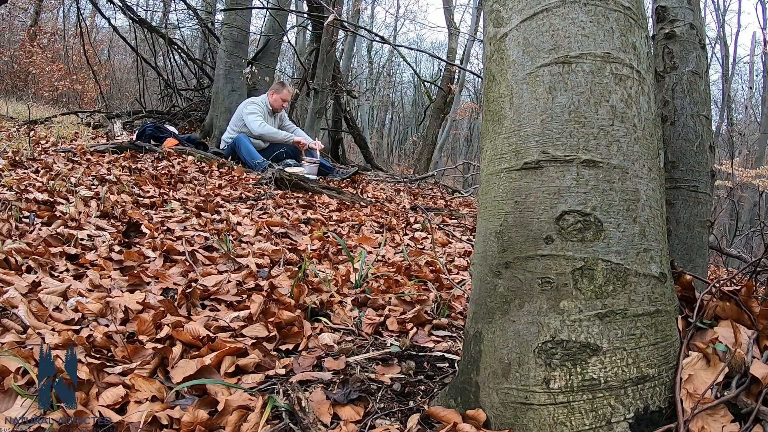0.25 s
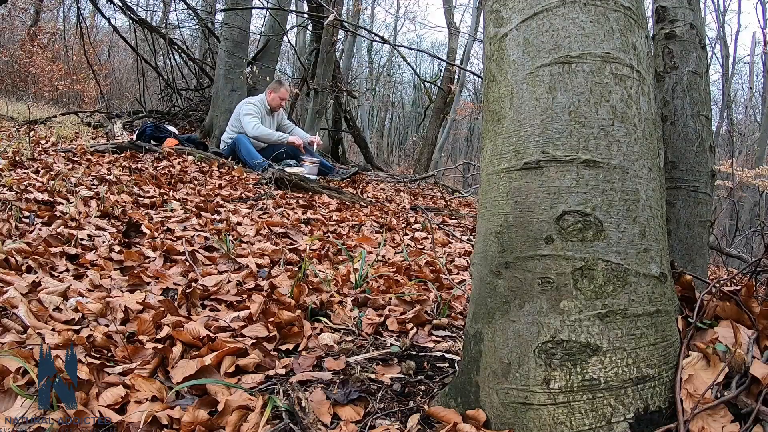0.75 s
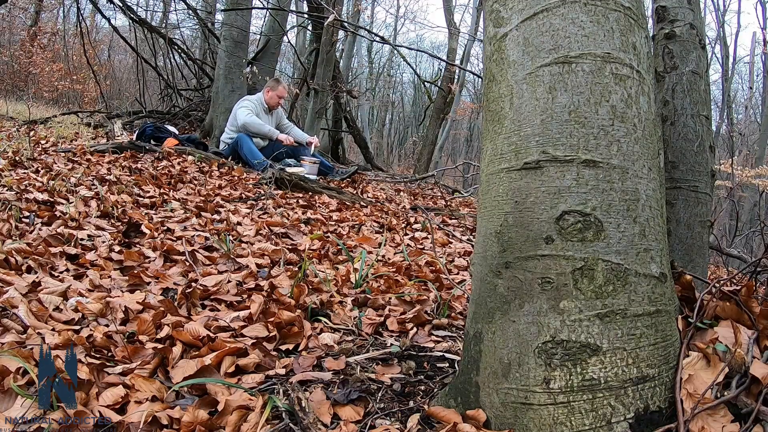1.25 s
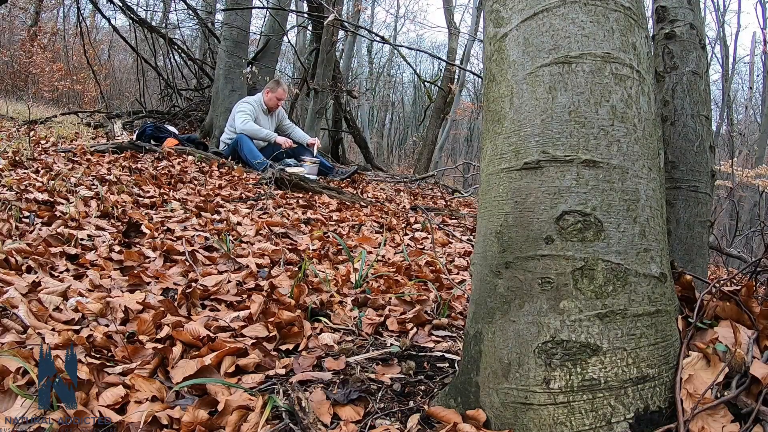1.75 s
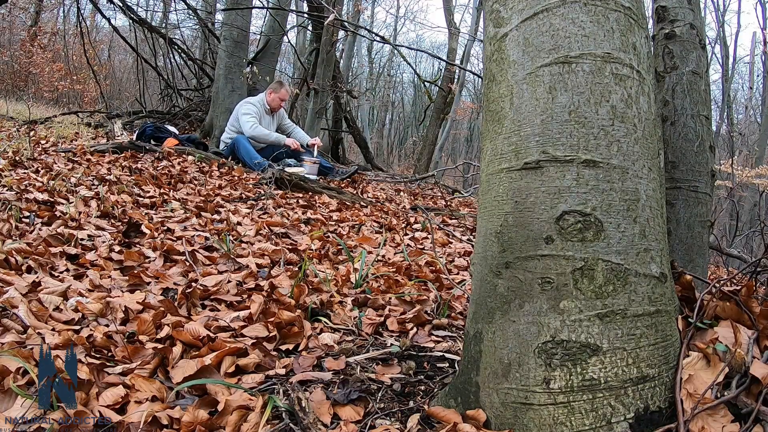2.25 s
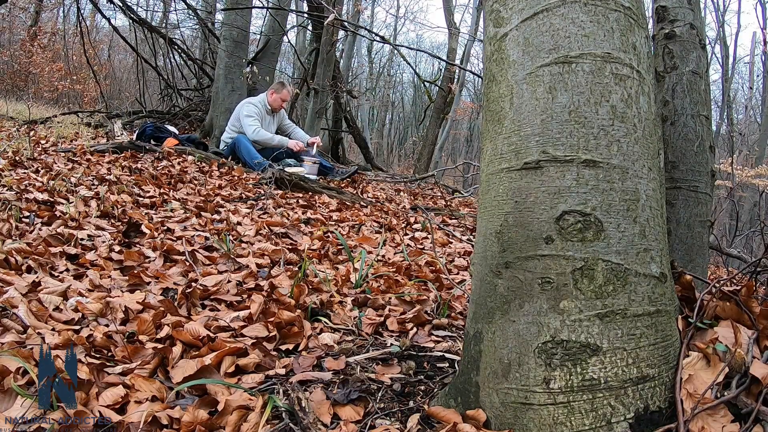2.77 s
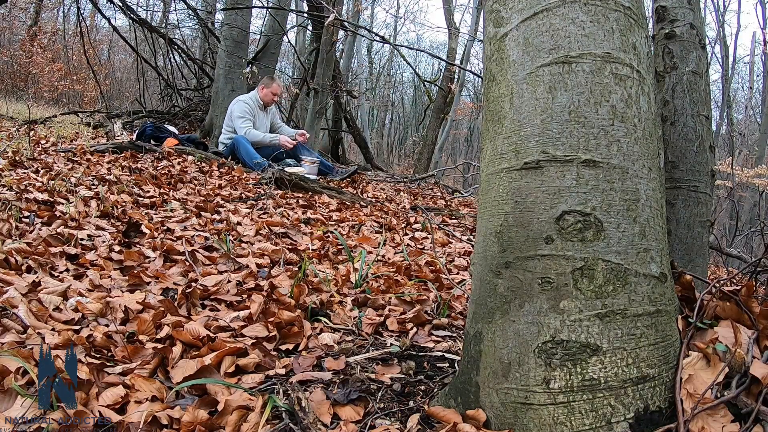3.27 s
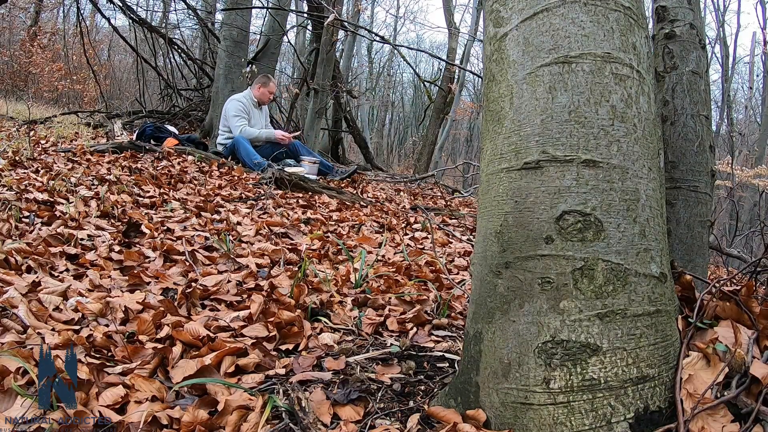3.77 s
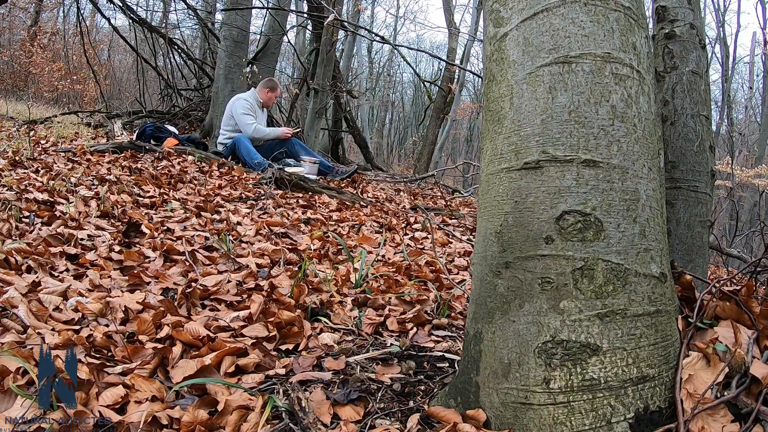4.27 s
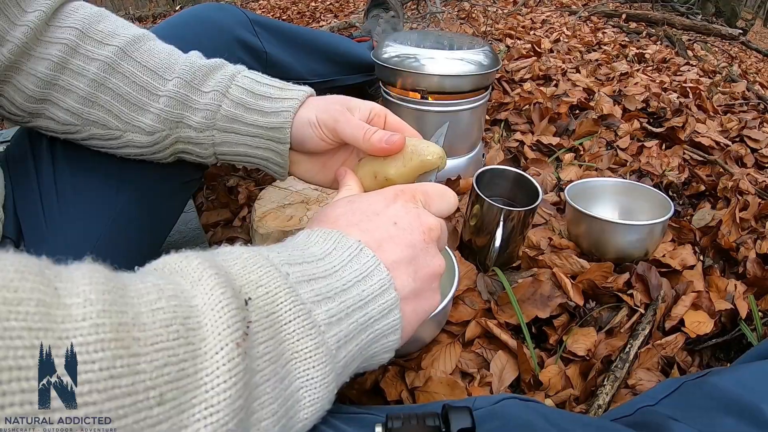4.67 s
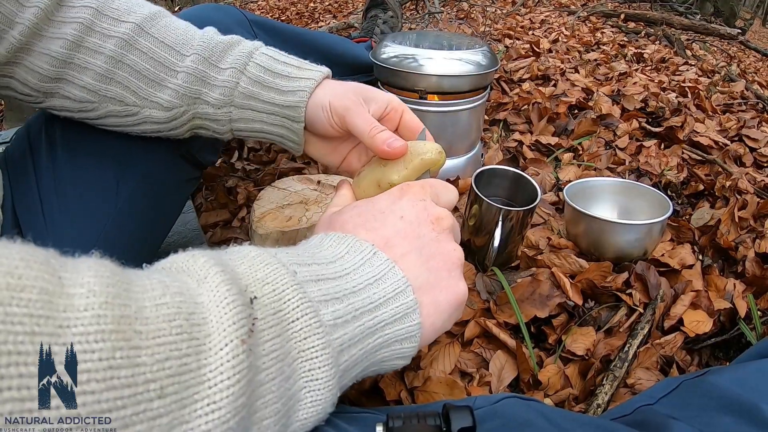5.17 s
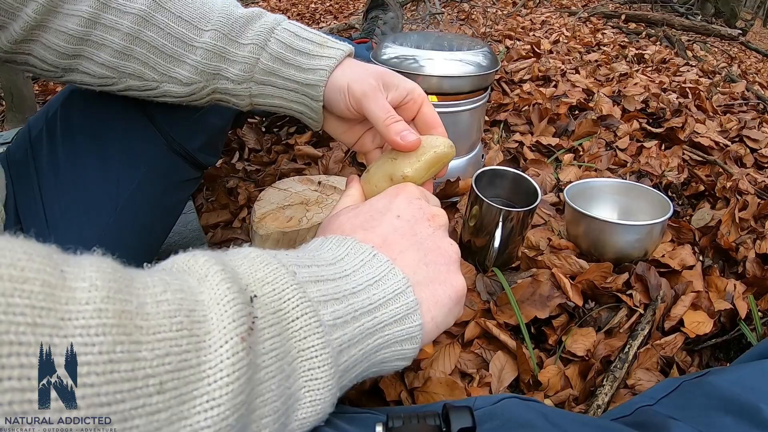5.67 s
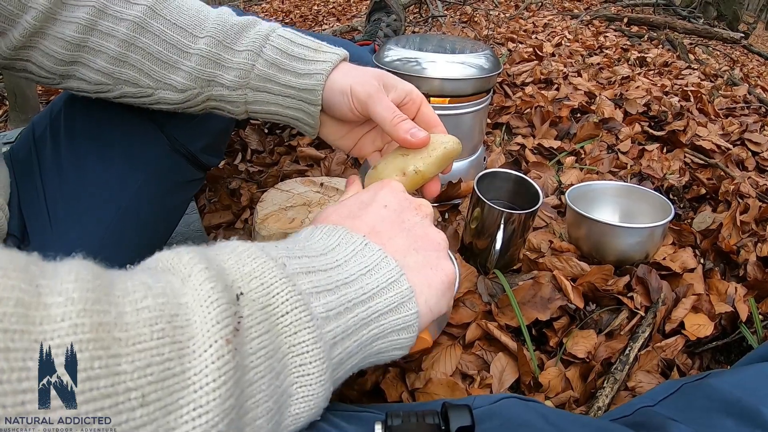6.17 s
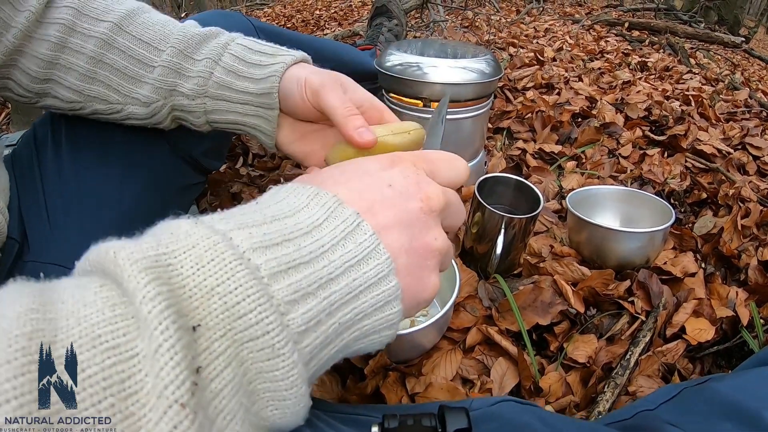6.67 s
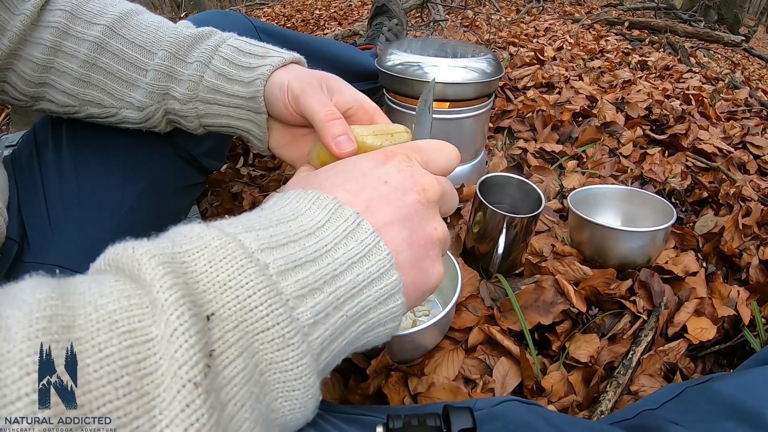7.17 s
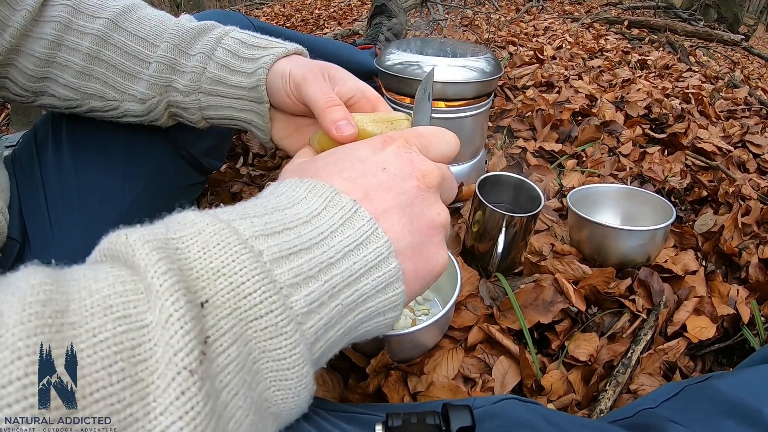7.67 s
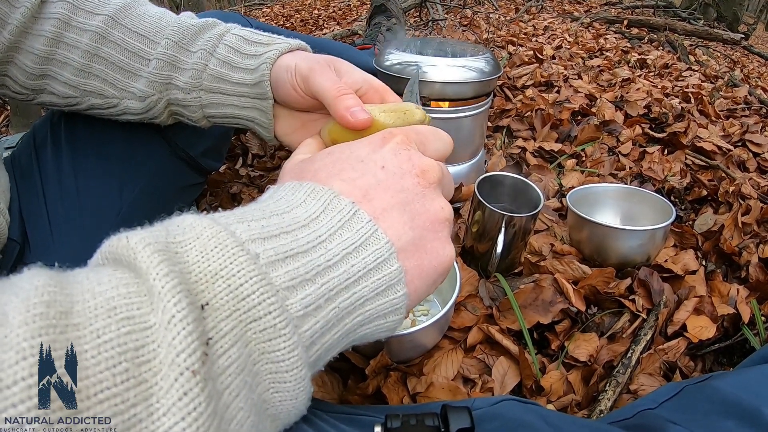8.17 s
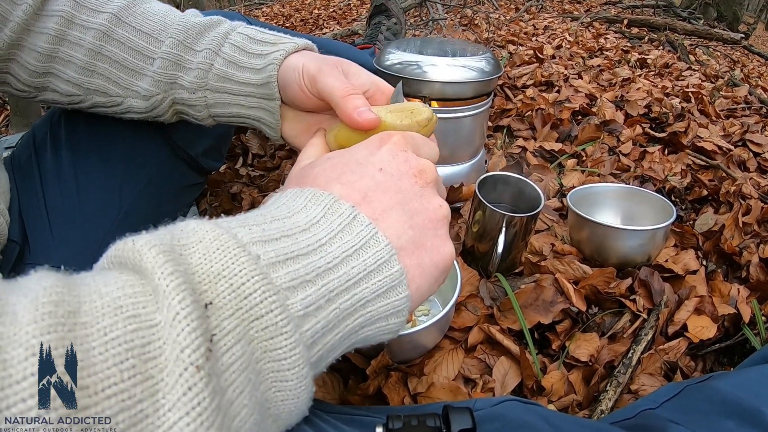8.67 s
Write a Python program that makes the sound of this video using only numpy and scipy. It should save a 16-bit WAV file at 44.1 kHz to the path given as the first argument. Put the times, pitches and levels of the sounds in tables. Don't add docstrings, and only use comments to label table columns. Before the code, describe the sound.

Steady frying hiss with small pops and dull ticks outdoors, distant at first, then suddenly near, under low gusty wind rumble.

```python
import sys
import numpy as np
from scipy import signal
from scipy.fft import rfft, irfft
from scipy.io import wavfile
from scipy.ndimage import uniform_filter1d

SR = 44100
rng = np.random.default_rng(int(sys.argv[2]) if len(sys.argv) > 2 else 0)


def store_pcm(level_fs):
    pcm = np.round(np.clip(level_fs, -1, 1) * 32767).astype(np.int16)
    wavfile.write(sys.argv[1], SR, np.atleast_2d(pcm).T)


def nominal_scale(level):
    x = np.asarray(level, float) / 20
    return 10 ** x


N = 393813
SPLICE_S = 4.48855
TIME = np.arange(N) / SR
NEAR = TIME >= SPLICE_S


def rms_one(x):
    return x / np.sqrt(np.mean(x ** 2) + 1e-20)


def in_time(far, near):
    far_s, far_db = np.transpose(far)
    near_s, near_db = np.transpose(near)
    return np.where(NEAR, np.interp(TIME, near_s, near_db), np.interp(TIME, far_s, far_db))


def bells_in_time(level, start_s, length_s):
    step = TIME[::64]
    bells = np.exp(-((step - start_s) / length_s) ** 2)
    return np.interp(TIME, step, np.sum(level * bells, axis=0))


def coloured(x, spectrum, peaks=(), size=8192):
    hz = np.arange(size // 2 + 1) * SR / size + 1e-3
    spectrum_hz, spectrum_db = np.transpose(spectrum)
    db = np.interp(np.log(hz), np.log(spectrum_hz), spectrum_db)
    for centre_hz, width_hz, peak_db in peaks:
        db = db + peak_db / (1 + (2 * (hz - centre_hz) / width_hz) ** 2)
    cepstrum = irfft(db * np.log(10) / 20, size)
    cepstrum[1:size // 2] *= 2
    cepstrum[size // 2 + 1:] = 0
    return signal.oaconvolve(x, irfft(np.exp(rfft(cepstrum)), size))[:N]


def whitened(x):
    hz, power = signal.welch(x, SR, nperseg=256)
    return coloured(x, np.c_[hz[1:], -10 * np.log10(power[1:])])


def filtered(x, hz, kind):
    return signal.sosfilt(signal.butter(2, hz, kind, fs=SR, output="sos"), x)


def split(x, edges_hz):
    bands = []
    for hz in edges_hz:
        bands.append(filtered(filtered(x, hz, "low"), hz, "low"))
        x = filtered(filtered(x, hz, "high"), hz, "high")
    return bands + [x]


def evened(x, over_s):
    size = int(over_s * SR)
    power = uniform_filter1d(uniform_filter1d(x ** 2, size), size)
    return rms_one(x / np.sqrt(power + 1e-20))


def drift(rate):
    r = np.exp(-80 * np.pi * rate / SR)
    slow = signal.lfilter([1], [1, -2 * r, r * r], rng.standard_normal(N // 40 + 2002))[2000:]
    return np.interp(np.arange(N) / 40, np.arange(len(slow)), rms_one(slow))


def grains(per_s, spread_db):
    sizes = nominal_scale(spread_db * np.minimum(rng.exponential(1, N), 5)) * rng.choice([-1, 1], N)
    return sizes * (rng.random(N) < per_s / SR)


def ring(clicks, hz, t60):
    r, w = nominal_scale(-60 / (t60 * SR)), 2 * np.pi * hz / SR
    return signal.lfilter([0, np.sin(w)], [1, -2 * r * np.cos(w), r * r], clicks + 1e-18)


# start_s, level_db
VIGOUR = [
    [(.03, -58), (.3, -60), (.95, -62), (1.35, -60), (1.85, -63.5), (2.2, -61.5), (2.75, -61.5),
     (3.1, -63.5), (4.45, -63.5)],
    [(4.52, -52), (4.8, -54.5), (5.05, -52.5), (5.9, -52), (6.05, -54.5), (6.7, -50), (7.1, -52),
     (7.65, -51), (8.9, -51.5)],
]
# start_s, level_db
FLARES = [(.17, 2), (0.522, 0.5), (.7, 1.5), (2.16, 1.5), (2.72, 1.5), (3.45, 2), (3.62, 2), (4.1, 0.5),
          (4.55, 1.5), (5.081, 0), (5.6, -0.5), (6.202, 2), (6.502, 1.5), (7.05, -1.5), (7.16, 2),
          (8.099, -0.5), (8.6, 1)]


def vigour():
    start_s, flare_db = np.transpose(FLARES)[:, :, None]
    db = in_time(*VIGOUR) + bells_in_time(flare_db, start_s, length_s=.06)
    return db - np.where(NEAR, db[NEAR].mean(), db[~NEAR].mean())


# pitch_hz, level_db (per Hz)
FAR_COLOUR = [(1100, -9.9), (1400, -6.9), (2100, -5.4), (3600, -9.7), (4700, -10.2), (6300, -12.3),
              (7000, -9.4), (8400, -7.6), (9300, -13.6), (10400, -17.6), (11300, -12.7), (12600, -10.7),
              (14000, -13.4), (15700, -15.6)]
# pitch_hz, level_db (per Hz)
NEAR_COLOUR = [(1000, -2.2), (1500, -4.3), (2100, -7.5), (3000, -3.6), (3800, -9.0), (5000, -10.0),
               (6000, -8.4), (6600, -9.6), (8600, -5.7), (9500, -10.0), (10800, -10.3), (12500, -10.1),
               (14200, -13.0), (15700, -13.5)]
# centre_hz, width_hz, peak_db
FAR_POT = [(1590, 450, 4.1), (2850, 310, 7.0), (3260, 230, 3.1), (4220, 600, 5.1), (5250, 600, 4.1),
           (5950, 260, 4.0), (7910, 1000, 2.9)]
# centre_hz, width_hz, peak_db
NEAR_POT = [(2460, 350, 5.3), (2870, 400, -7.0), (3450, 600, 2.1), (4120, 80, 2.4), (4470, 220, 6.3),
            (5640, 150, 1.3), (6600, 400, 5.0), (7200, 600, 5.1), (7950, 370, 5.5), (8360, 400, 2.6),
            (11570, 130, 3.9)]
# delay_s, level_db
LID_ECHOES = [
    (.0034, -30),
    (.0047, -17),
]


def fry():
    clumps = nominal_scale(2.2 * drift(12))
    clicks = grains(np.where(NEAR, 7000, 4000) * clumps, spread_db=3.5)
    clicks += np.where(NEAR, .9, .7) * rng.standard_normal(N)

    pitches_hz = np.geomspace(800, 16500, 26)
    dealt = rng.integers(0, 26, N)
    patches = [nominal_scale(2.3 * drift(16)) for _ in range(13)]
    bursts = 0
    for k, hz in enumerate(pitches_hz):
        struck = clicks * (dealt == k) * patches[k // 2]
        bursts = bursts + rms_one(ring(struck, hz, t60=20.7 / hz)) * np.sqrt(hz)

    dull_ticks = rms_one(grains(np.where(NEAR, 300, 220) * clumps, spread_db=4.0))
    dull_ticks = filtered(dull_ticks, 5500, "low")
    raw = rms_one(whitened(bursts)) + np.where(NEAR, .3, .45) * dull_ticks
    steam = split(rng.standard_normal(N), [4500])[1] * nominal_scale(1.5 * drift(19))
    raw = whitened(raw + np.where(NEAR, 1.3, .9) * steam)
    for delay_s, db in LID_ECHOES:
        raw = raw + NEAR * nominal_scale(db) * np.roll(raw, round(delay_s * SR))

    edges_hz = [900, 2700, 6000]
    far_bands = split(coloured(raw, FAR_COLOUR, FAR_POT), edges_hz)[1:]
    near_bands = split(coloured(raw, NEAR_COLOUR, NEAR_POT), edges_hz)[1:]
    swing_db = vigour()
    # far dB, near dB, share of the swing
    levels = (-64, -57.5, .62), (-62.5, -56, .61), (-62, -53, 1)
    out = 0
    for (far_db, near_db, share), far, near in zip(levels, far_bands, near_bands):
        band = evened(np.where(NEAR, rms_one(near), rms_one(far)), over_s=.2)
        out = out + nominal_scale(share * swing_db + np.where(NEAR, near_db, far_db)) * band
    return out


# start_s, level_db
GUST = [
    [(.05, -14.5), (.4, -32), (1.5, -22.5), (2.2, -29), (2.6, -29), (3.1, -29), (3.5, -31.5), (3.75, -28.5),
     (4.42, -29.5)],
    [(4.55, -16.5), (5.3, -25), (5.9, -14), (6.3, -17.5), (6.6, -12), (7.05, -13), (7.5, -15), (8.2, -17),
     (8.9, -15)],
]
# start_s, rumble_db, length_s, sharpness_db
EDDIES = [(0.082, -43.5, 0.065, 7), (0.855, -50, .06, -1), (0.604, -53.5, 0.11, 8.5),
          (1.014, -55, 0.048, 8.5), (1.26, -44, 0.17, 1.5), (1.577, -38.5, .07, 8.5),
          (1.772, -32, 0.019, -2), (2.05, -47, 0.12, -0.5), (2.27, -53, 0.086, 7.5), (.42, -41, 0.04, -2.),
          (2.846, -46, 0.088, 4), (3.046, -55, 0.08, -2), (4.3, -50, 0.089, -6), (4.63, -26.5, 0.029, -2),
          (4.749, -31.5, 0.064, 0), (5.045, -38, 0.079, -12), (5.29, -39, 0.12, -7), (5.685, -43, 0.076, 1),
          (5.96, -37.5, 0.025, -3), (6.52, -32.5, .11, -2.5), (6.73, -29, 0.097, -10),
          (7.192, -35, 0.056, 4), (7.446, -36, 0.098, -6), (7.655, -32, 0.13, -4), (7.853, -22, 0.036, -1),
          (8.018, -27.5, 0.051, 7), (8.15, -35.5, 0.048, 0), (8.468, -26, 0.076, 3.5),
          (8.627, -30, 0.038, 6), (8.845, -33, 0.03, 10.5)]


def wind_levels():
    gust_db = uniform_filter1d(in_time(*GUST), size=1500)
    start_s, db, length_s, sharp_db = np.transpose(EDDIES)[:, :, None]
    flutter_db = sharp_db - 57 + .54 * (db + 32.5)
    push = nominal_scale(gust_db) + bells_in_time(nominal_scale(db - 10.5), start_s, length_s)
    rumble = nominal_scale(gust_db - 36) + bells_in_time(nominal_scale(db), start_s, length_s)
    flutter = nominal_scale(-61 + .35 * (gust_db + 18.5)) + bells_in_time(nominal_scale(flutter_db), start_s, length_s)
    return push, rumble, flutter


# pitch_hz, level_db (per Hz)
WIND_SLOPE = [(2, -0.5), (5, -0.5), (10, -14), (17, -13.5), (30, -33.5), (60, -40.5), (110, -53.5),
              (200, -66), (400, -106)]
# start_s, pressure (full scale)
PUSH = [
    (0, -.085),
    (4.48855, -.16),
    (8.93, -.23),
]


def wind():
    eddies = coloured(grains(per_s=230, spread_db=3.0), WIND_SLOPE, size=65536)
    bands = split(eddies, [22, 55])
    swell, rumble, flutter = (level * evened(band, over_s)
                              for level, band, over_s in zip(wind_levels(), bands, (.25, .08, .04)))
    swell = .5 * np.tanh(swell / .5)
    out = split(swell, [30])[0] + split(rumble, [130])[0] + flutter
    out *= np.where(NEAR, 1, np.clip((SPLICE_S - TIME) / .071, 0, 1))
    for (start_s, push), side in zip(PUSH, (1, 1, -1)):
        since = side * (TIME - start_s)
        offset = push - out[min(int(np.ceil(start_s * SR)), N - 1)]
        out += offset * (since >= 0) * np.exp(-(since / .048) ** 2)
    return out


# pitch_hz, level_db (per Hz)
MURMUR = [(120, -11.5), (200, 3), (400, 1), (700, -0.5), (900, -1), (1300, -5), (2500, -52.5)]


def murmur():
    hiss = rms_one(coloured(rng.standard_normal(N), MURMUR))
    low, high = split(hiss, [316])
    hiss = high + low * nominal_scale(NEAR * -5)
    swell_db = NEAR * .74 * vigour()
    return nominal_scale(np.where(NEAR, -57.5, -68.5) + swell_db + drift(6.3)) * hiss


def small_spits():
    odds = np.cumsum(nominal_scale(1.5 * vigour() + 4 * NEAR))
    when, size, pitch = rng.random((70, 3)).T
    pitch_hz = 1500 * (9000 / 1500) ** pitch
    start_s = np.interp(when, odds / odds[-1], TIME)
    level_db = -55 + 5.5 * (start_s > SPLICE_S) + 21 * (size - .5)
    return np.c_[start_s, level_db, pitch_hz]


# start_s, level_db (peak), pitch_hz
SPITS = [(0.2977, -41, 3880), (0.1805, -37, 5200), (0.2368, -39, 1510), (0.2978, -38, 2530),
         (0.7004, -40, 11300), (2.1468, -35, 7900), (2.2411, -35, 2820), (2.2405, -41, 1320),
         (2.5741, -48, 2330), (2.7298, -41, 8530), (3.049, -44, 1810), (3.6124, -38, 7950),
         (4.1031, -41, 7800), (4.87, -36.5, 1270), (5.0968, -39.5, 1370), (5.3114, -40, 3130),
         (5.5137, -37, 3600), (5.6779, -38, 3530), (6.344, -31, 7410), (6.4537, -36.5, 4080),
         (6.5082, -36.5, 3550), (6.5647, -40, 2320), (6.9022, -35, 2500), (7.16, -36, 11020),
         (7.295, -35.5, 448), (7.7746, -32, 1740), (7.8808, -36, 7920), (7.9787, -34.5, 710),
         (8.4008, -35.5, 600), (8.5729, -40, 3300)]


def spits():
    out, cracks = np.zeros(N + 1500), np.zeros(N + 1500)
    after = np.arange(1500) / SR
    pops = np.r_[SPITS, small_spits()]
    noises = rng.standard_normal((len(pops), len(after)))
    for (start_s, db, hz), noise in zip(pops, noises):
        start = round(start_s * SR)
        at = slice(start, start + len(after))
        t60 = min(.021 * (hz / 2000) ** -.8, .014)
        onset = 1 - np.exp(-after / t60 * 40)
        tone = np.sin(2 * np.pi * hz * after * (1 + 1.7 * after))
        out[at] += nominal_scale(db - 1.5 - 60 * after / t60) * onset * tone
        cracks[at] += nominal_scale(db - 9 - 60 * after / .01) * noise
    return out[:N] + filtered(cracks[:N], [500, 7000], "band")


# start_s, level_db (peak)
TICKS = [(0.2296, -44), (0.297, -49), (0.3333, -43), (0.4902, -34.5), (0.5606, -37), (0.6605, -36.5),
         (1.254, -44), (1.891, -38), (2.2398, -33.5), (2.5744, -40), (2.714, -40), (2.7716, -37),
         (3.4087, -38.5), (3.7484, -41), (4.463, -38), (4.872, -74), (6.566, -29.5), (6.7854, -32.5)]


def ticks():
    out, after = np.zeros(N), np.arange(600) / SR
    noises = rng.standard_normal((len(TICKS), len(after)))
    for (start_s, db), noise in zip(TICKS, noises):
        out[round(start_s * SR):][:len(after)] += nominal_scale(db + 1.5 - 60 * after / .025) * noise
    out = filtered(out, 6000, "low")
    return split(coloured(out, FAR_COLOUR, FAR_POT), [1100])[1]


# start_s, level_db
HUM = [
    (8.24, -83),
    (8.3, -58.5),
    (8.53, -60.5),
    (8.6, -72),
    (8.74, -76),
    (8.8, -60.5),
    (8.93, -57),
]


def hum():
    start_s, level_db = np.transpose(HUM)
    pitch_hz = 231 * (1 + .0042 * drift(3.6))
    return nominal_scale(np.interp(TIME, start_s, level_db)) * np.sin(2 * np.pi * np.cumsum(pitch_hz) / SR)


def scene():
    return (fry() + wind() + murmur() + spits() + ticks() + hum())[None]


def band_limit(x):
    return signal.sosfilt(signal.butter(12, 16090, fs=SR, output="sos"), x)


def record(dry):
    cutoff_hz = 15740
    spectrum = rfft(dry)
    spectrum[:, round(cutoff_hz * N / SR):] = 0
    mix = irfft(spectrum, N)
    return band_limit(mix)


dry = scene()
out = record(dry)
store_pcm(out)
```